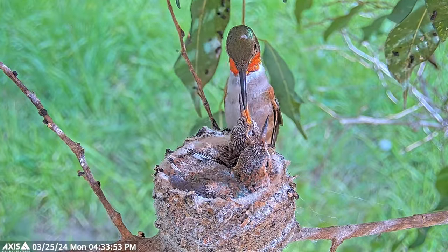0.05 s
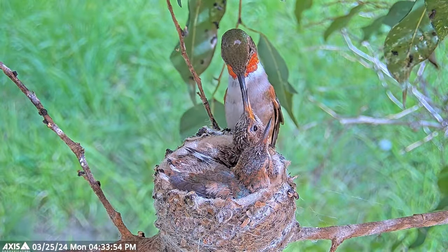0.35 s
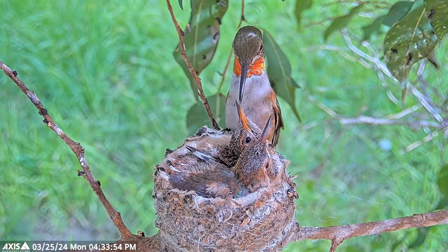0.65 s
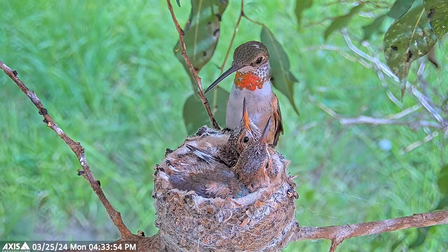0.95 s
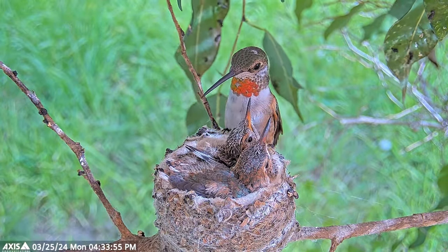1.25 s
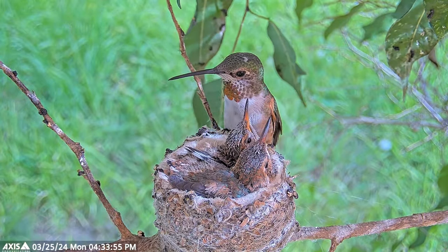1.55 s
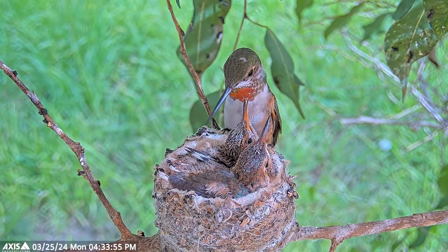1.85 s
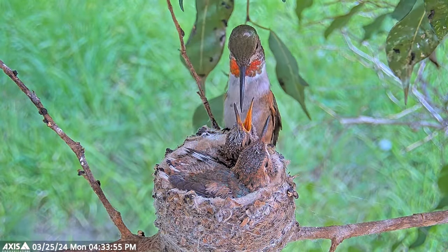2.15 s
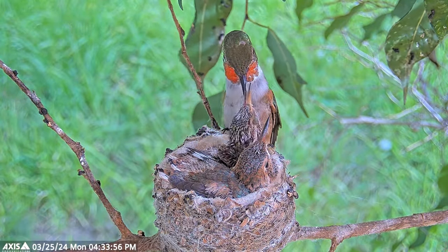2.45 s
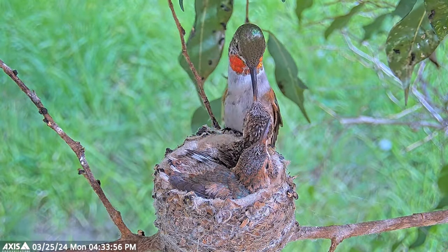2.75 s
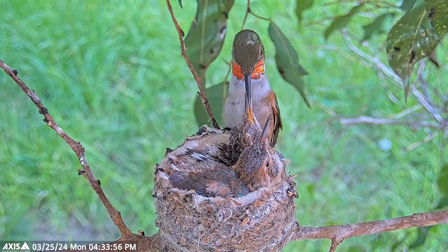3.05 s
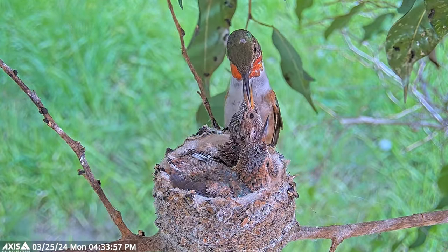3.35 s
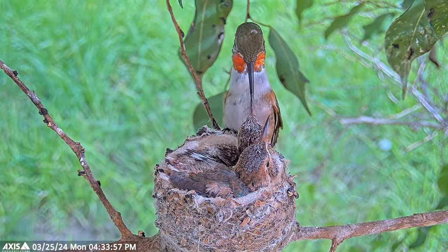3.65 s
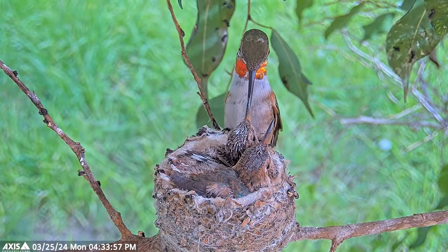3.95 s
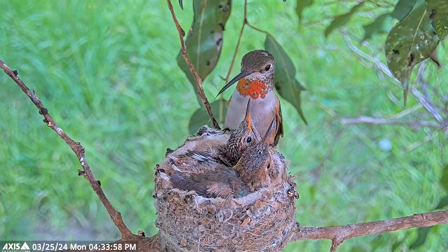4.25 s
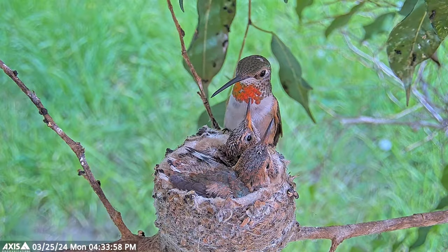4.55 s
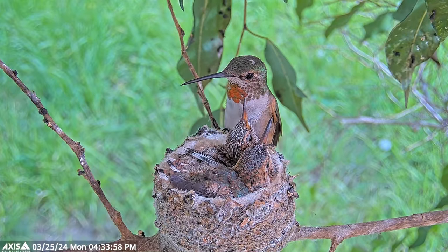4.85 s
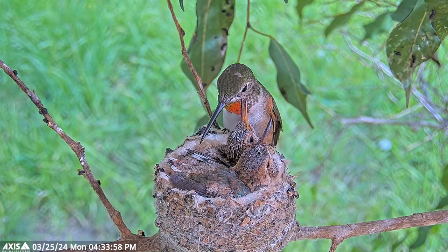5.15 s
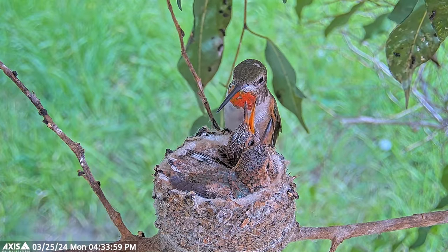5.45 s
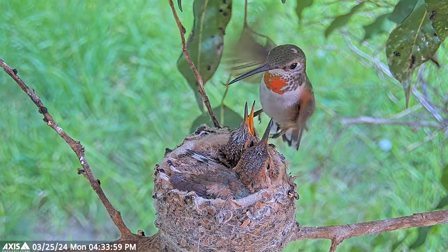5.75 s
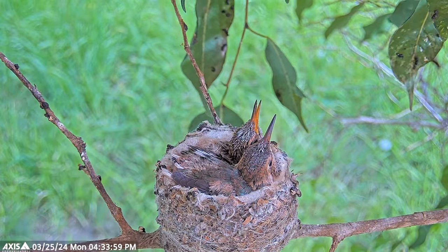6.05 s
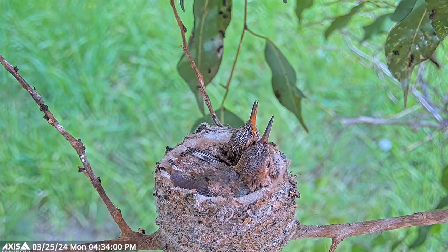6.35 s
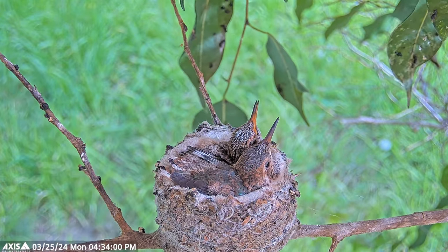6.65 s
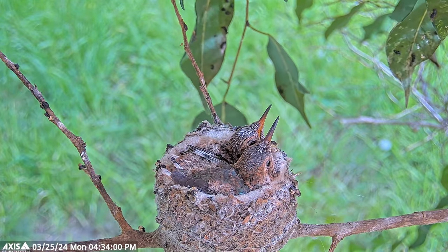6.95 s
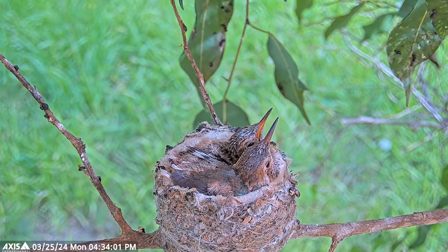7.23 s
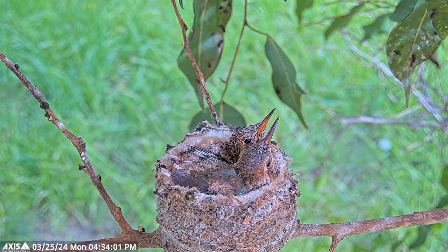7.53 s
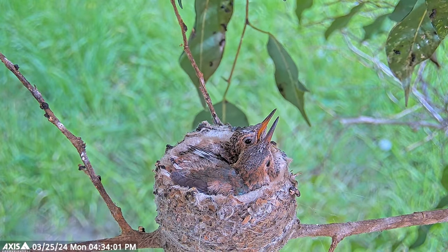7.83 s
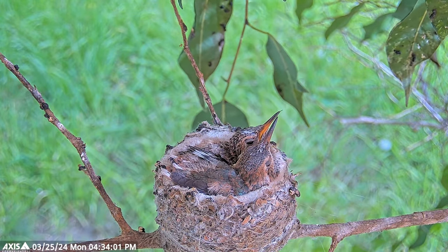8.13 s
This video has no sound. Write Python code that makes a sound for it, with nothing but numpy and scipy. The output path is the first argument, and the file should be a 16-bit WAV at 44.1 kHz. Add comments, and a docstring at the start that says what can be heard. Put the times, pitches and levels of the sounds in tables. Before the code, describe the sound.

A quiet garden ambience runs throughout: low rumble and tyre noise from distant traffic, with a steady hiss. At about 0.5 seconds a distant bird gives one short, hoarse rising whistle. Faint peeps and dry chips follow between 2.2 and 3.5 seconds, lightly echoing. Far engines drone softly from about 2.5 seconds, and distant cars swell gently around 4.5 and 7 seconds.

At about 5.9 seconds a hummingbird takes off close to the microphone, with a few tiny, sharp clicks of claws and feathers on the nest. Its wings make a low, buzzing hum with a rapidly pulsing, airy swish. The hum wavers and dips slightly in pitch, is loudest around 6.5 to 6.6 seconds with a brief feather rasp, and fades by 7 seconds. The rumble, engine drone and hiss continue until the end, just past 8 seconds.

```python
"""In a garden, a hummingbird leaves its nest beside a small camera microphone, hovers and darts past.
Periodic forces of the wings on the air make a harmonic hum; turbulent flow through the feathers
makes a swish pulsed by the strokes. Other birds call faintly, scattered by leaves and walls.
Beneath it all lie the rumble, tyre roar and engine drone of distant traffic, and a steady hiss."""
import sys
import numpy as np
from scipy import signal
from scipy.fft import rfft, irfft, next_fast_len
from scipy.io import wavfile
from scipy.ndimage import uniform_filter1d

SR = 44100
rng = np.random.default_rng(int(sys.argv[2]) if len(sys.argv) > 2 else 0)


def dump(signal):
    """Clip the signal to [-1, 1] and save it as 16-bit WAV at the path in sys.argv[1]."""
    limited = np.clip(np.atleast_2d(signal).T, -1, 1)
    pcm = np.round(limited * 32767).astype(np.int16)
    wavfile.write(sys.argv[1], SR, pcm)


N = 365588
TIME = np.arange(N) / SR

# spectra of ground rumble, tyre roar and hiss: f/Hz, relative spectral density/dB
RUMBLE_SPECTRUM = [(12, -15), (25, 7.5), (45, 0.5), (70, -2.5), (100, -6.5), (150, -14.5), (250, -21),
                   (500, -39), (4000, -90)]
TYRE_SPECTRUM = [(100, -15), (200, -5), (330, -1), (600, -3), (850, -4), (1200, -12.5), (1800, -10),
                 (2500, -23), (5000, -35), (16000, -70)]
HISS_SPECTRUM = [(200, -1.5), (1200, 0), (2500, 0), (5000, -1), (7500, -3.5), (9500, -7.5), (11500, -14.5),
                 (13500, -17.5), (16000, -20.5)]
# distant cars: closest t/s, time to half power/s, peak level/dB
CAR_PASSES = [(3.3, 0.75, -53.5), (4.5, 0.55, -45), (5.8, .4, -47), (7.25, 0.62, -45)]
# slow drift of the hiss: t/s, level/dB
HISS_ENVELOPE = [(0, -49), (1.4, -46.5), (4, -48.5), (5.8, -48), (7, -47), (7.5, -48), (8.29, -46)]
# far engines: loudest t/s, half length/s, f/Hz, glide/(Hz/s), level/dB, level of the octave/dB
ENGINES = [(0.997, 1.05, 114.8, 1, -64, -56), (2.601, 0.79, 115.3, 0.5, -54, -53.5),
           (2.798, 0.93, 95, 1.5, -47, -56.5), (3.795, 0.66, 90.5, -1, -41.5, -60),
           (5.3, 0.78, 91.3, 0, -46.5, -51), (7.099, 1.63, 118.1, 0.75, -40, -50),
           (7.499, 0.93, 89.1, -3, -42.5, -56), (7.3, 0.84, 213.6, -3.5, -52, -55)]
# faint bird notes: t/s, length/s, start f/Hz, end f/Hz, level/dB
PEEP_NOTES = [(2.17, 0.027, 3210, 3030, -56), (2.393, 0.074, 3620, 3430, -63),
              (3.188, 0.044, 3577, 3360, -53), (3.213, 0.034, 7900, 6650, -53),
              (3.285, 0.033, 8770, 8100, -54), (3.353, 0.021, 2070, 2190, -50),
              (3.375, .04, 8430, 7200, -54), (3.483, 0.038, 4810, 5000, -52)]
# distant dry chips: t/s, initial level/dB, centre f/Hz
CHIP_NOTES = [(2.378, -40, 2600), (2.392, -51, 3600), (2.445, -45.5, 1900)]
# wingbeat rate, fastest at lift-off and slowest in the hover: t/s, f/Hz
WINGBEAT = [(5.84, 58.9), (5.98, 65.6), (6.07, 57.5), (6.17, 59.8), (6.24, 55.25), (6.38, 49.74),
            (6.51, 53.67), (6.95, 55.1)]
# gain of the wing sound as the bird nears and leaves the microphone: t/s, gain/dB
FLIGHT_GAIN = [(5.87, -47.5), (5.975, -37), (6.035, -37.5), (6.092, -27), (6.14, -31.5), (6.19, -32.5),
               (6.238, -37), (6.29, -29), (6.42, -31), (6.495, -22), (6.612, -23), (6.78, -43.5),
               (6.95, -47)]
# the bird banks away: t/s, half length/s
BANKING = [(6.182, 0.036), (6.688, 0.12)]
# spectral envelopes of the wing reversal and the wingtip buzz: f/Hz, relative level/dB
FLICK_SPECTRUM = [(150, 3), (215, 2.5), (260, -1.5)]
BUZZ_SPECTRUM = [(250, 4.5), (290, 3), (350, -1), (385, -6.5), (430, 1.5), (480, 2.5), (540, -7.5),
                 (600, -4.5), (660, -9), (760, -24)]
# air through the feathers: f/Hz, relative spectral density/dB
SWISH_SPECTRUM = [(300, 10.5), (800, 4.5), (1300, -4), (2500, -1), (4800, -3.5), (7500, -0.5),
                  (10000, -10.5), (13000, -19), (16000, -29)]
# claws and feathers catch on the nest: t/s, initial level before the low-pass/dB, centre f/Hz
NEST_SNAGS = [(5.878, -39, 8060), (5.904, -39, 7000), (5.9815, -29, 7450), (6.0212, -27.5, 5500),
              (6.206, -37, 7000)]
# feathers rub in a swerve: t/s, half length/s, level/dB, centre f/Hz
FEATHER_RASPS = [(6.10, 0.014, -50, 3500), (6.502, 0.029, -39, 4700)]


def undb(db):
    """Amplitude ratio for a level in decibels."""
    return 10 ** (np.asarray(db) / 20)


def unit(x):
    """Normalisation to rms 1."""
    return x / np.sqrt(np.mean(x ** 2))


def curves(table):
    """Linear interpolation of a table's columns in time."""
    s, *columns = np.transpose(table)
    return [np.interp(TIME, s, c) for c in columns]


def swell(s, half_length):
    """Gaussian envelope: 1 at time s, 1/e a half length away."""
    return np.exp(-((TIME - s) / half_length) ** 2)


def walk(rate_hz):
    """Random modulation: smoothed noise with a spread near 1."""
    hold = int(SR / rate_hz)
    steps = np.repeat(rng.standard_normal(N // hold + 1), hold)[:N]
    return 1.3 * uniform_filter1d(uniform_filter1d(steps, hold), hold)


def noise(spectrum):
    """Spectral shaping of white noise, at rms 1."""
    hz, db = np.transpose(spectrum)
    size = next_fast_len(N)
    f = np.maximum(np.fft.rfftfreq(size, 1 / SR), 1)
    gain = undb(np.interp(np.log(f), np.log(hz), db)) * np.minimum(f / hz[0], 1)
    return unit(irfft(rfft(rng.standard_normal(size)) * gain, size)[:N])


def band_noise(hz, spread, n):
    """Band-pass noise whose edges lie a factor 1 + spread either side of hz."""
    band = signal.butter(2, [hz / (1 + spread), hz * (1 + spread)], "band", fs=SR, output="sos")
    return signal.sosfilt(band, rng.standard_normal(n))


def traffic(roads_db=-54, rumble_base_db=-39.5, rumble_follows=0.4, gust_db=1):
    """Inverse-square law: passing cars add in power to the roads' roar, and the rumble grows with it."""
    passing = sum(undb(db) ** 2 / (1 + ((TIME - s) / half_time) ** 2) for s, half_time, db in CAR_PASSES)
    roar = np.sqrt(undb(roads_db) ** 2 + passing)
    rumble = undb(rumble_base_db + 6.4 * swell(6.26, 0.56))  # swells around take-off
    rumble *= (roar / undb(roads_db)) ** rumble_follows
    return noise(RUMBLE_SPECTRUM) * rumble * undb(gust_db * walk(9.6)) + noise(TYRE_SPECTRUM) * roar


def hiss():
    """Broadband noise with a slowly drifting level."""
    level_db, = curves(HISS_ENVELOPE)
    return noise(HISS_SPECTRUM) * undb(level_db)


def engine(s, half_length, hz, glide, db, octave_db, waver=0.00413, flutter_db=2):
    """Periodic firing gives a far engine a fundamental and its octave, which swell and fade."""
    pitch = (hz + glide * (TIME - s)) * (1 + waver * walk(6))
    phase = 2 * np.pi * np.cumsum(pitch) / SR
    fundamental = undb(db + flutter_db * walk(7.5)) * np.sin(phase)
    octave = undb(octave_db + flutter_db * walk(6.7)) * np.sin(2 * phase)
    return np.sqrt(2) * swell(s, half_length) * (fundamental + octave)


def rising_call(start_s=.52, length_s=.122, start_hz=2470, top_hz=3795, gain_db=-39.5,
                attack_s=0.032, release_s=0.0079, fall_db_per_s=31):
    """Random frequency and amplitude modulation make a bird's upward whistle hoarse."""
    t = TIME - start_s
    to_go = np.clip(1 - t / length_s, 0, 1)
    hz = top_hz - (top_hz - start_hz) * to_go ** 2
    phase = 2 * np.pi * np.cumsum(hz * (1 + .024 * walk(600))) / SR
    tone = np.sin(phase) + undb(-12) * np.sin(1.31 * phase)  # weaker partial about a fourth above
    envelope = np.clip(np.minimum(t / attack_s, (length_s - t) / release_s), 0, 1)
    throb = 1 - 0.43 * np.sin(np.pi * (TIME - 0.566) / 0.047) ** 2  # peaks in mid climb and at the top
    gain = undb(gain_db - fall_db_per_s * np.clip(t, 0, length_s))
    hoarseness = 1 + undb(-7) * walk(500)
    return np.sqrt(2) * gain * envelope * throb * hoarseness * tone


def garden_scatter(x, t60=0.49, wet_db=-3, build_s=0.0053):
    """Reverberation: leaves and walls scatter sound into a diffuse, exponentially decaying tail."""
    t = TIME[:SR]
    tail = rng.standard_normal(SR) * np.exp(-np.log(1000) * t / t60) * (1 - np.exp(-t / build_s))
    return x + undb(wet_db) * signal.fftconvolve(x, tail / np.linalg.norm(tail))[:N]


def peeps():
    """Random frequency modulation gives short gliding notes a husky quaver."""
    out = np.zeros(N)
    quaver = 1 + .035 * walk(900)
    for s, length, start_hz, end_hz, db in PEEP_NOTES:
        i, n = int(s * SR), int(length * SR)
        phase = 2 * np.pi * np.cumsum(np.linspace(start_hz, end_hz, n) * quaver[i:i + n]) / SR
        out[i:i + n] += np.sqrt(2) * undb(db) * np.sin(phase) * signal.windows.tukey(n, .5)
    return out


def bursts(table, decay_s, spread):
    """Transients of band-limited noise with exponential decay."""
    out = np.zeros(N)
    t = TIME[:SR // 2]
    for s, db, hz in table:
        i = int(s * SR)
        out[i:i + len(t)] += undb(db) * unit(band_noise(hz, spread, len(t))) * np.exp(-t / decay_s)
    return out


def chips():
    """Rapidly damped noise is heard as the dry chips of distant birds."""
    return bursts(CHIP_NOTES, decay_s=0.013, spread=0.47)


def wings(mid_downstroke_s=6.567, fade_s=0.027, steady_air=0.26, upstroke=0.46):
    """One periodic motion, the wingbeat, sets the phase of the hum, overtones and feather noise."""
    hz, = curves(WINGBEAT)
    gain_db, = curves(FLIGHT_GAIN)
    bank = sum(swell(s, half_length) for s, half_length in BANKING)
    turns = np.cumsum(hz) / SR
    turns -= turns[int(mid_downstroke_s * SR)]  # whole turns fall in mid downstroke
    # air rushes through the feathers in the middle of each half stroke
    airflow = steady_air + stroke_pulse(turns, 0, 0.071) + upstroke * stroke_pulse(turns, 0.48, 0.069)
    inside_s = np.minimum(TIME - FLIGHT_GAIN[0][0], FLIGHT_GAIN[-1][0] - TIME)
    flying = np.clip(inside_s / fade_s + 1, 0, 1)
    sound = wing_hum(turns, bank) + wing_overtones(hz, turns, bank) + feather_swish(hz, turns, airflow)
    return flying * undb(gain_db) * sound + feather_rasps(airflow)


def stroke_pulse(turns, centre, width):
    """Periodic envelope: one smooth pulse per beat, with centre and width in turns."""
    return np.exp((np.cos(2 * np.pi * (turns - centre)) - 1) / (2 * np.pi * width) ** 2)


def wing_hum(turns, bank, lift_db=2, drag_db=6.5):
    """Oscillating forces radiate tones: lift peaks once a beat, drag on both half strokes."""
    # directivity: banking turns the lift tone towards the microphone, a steep bank the drag tone away
    lift = undb(lift_db + 11 * bank) * np.cos(2 * np.pi * turns)
    drag = undb(drag_db - 13 * bank ** 4) * np.cos(4 * np.pi * turns)
    return np.sqrt(2) * (lift + drag)


def wing_overtones(hz, turns, bank, reversal_turns=0.244, flick_db=-1, buzz_db=-10, flutter_db=1.9):
    """Brief pulses are rich in harmonics: the wing flicks over at the reversal and its tips buzz."""
    since_reversal = turns - reversal_turns
    flick = harmonics(FLICK_SPECTRUM, hz, since_reversal, wander_rad=.22, orders=range(3, 5))
    buzz_gain = undb(buzz_db + 2.5 * bank + flutter_db * walk(46))  # banking aims it at the microphone
    buzz = harmonics(BUZZ_SPECTRUM, hz, since_reversal, wander_rad=.35, orders=range(5, 15))
    return undb(flick_db) * flick + buzz_gain * buzz


def harmonics(spectrum, hz, turns, wander_rad, orders):
    """Fourier synthesis of one pressure dip per beat, at rms 1; drifting phases vary its shape."""
    f, db = np.transpose(spectrum)
    out = power = 0
    for k in orders:
        gain = undb(np.interp(k * hz, f, db))
        out = out - gain * np.cos(2 * np.pi * k * turns + wander_rad * walk(16))
        power = power + gain ** 2 / 2
    return out / np.sqrt(power)


def feather_swish(hz, turns, airflow, cruise_hz=52, cruise_db=-15, db_per_hz=0.72, tick_db=-14):
    """Turbulent flow through the feathers makes pulsed noise, stronger as the wings beat faster."""
    rush = unit(noise(SWISH_SPECTRUM) * airflow * undb(1.3 * walk(110)))
    # the feather tips tick softly as they fan out before the downstroke
    fanning = np.exp(-((turns - .72) % 1) / .09) * undb(2 * walk(55))
    ticks = unit(noise([(3000, -20), (8500, 0), (11500, -4), (15000, -17)]) * fanning)
    return undb(cruise_db + db_per_hz * (hz - cruise_hz)) * (rush + undb(tick_db) * ticks)


def nest_snags(edge_hz=9600):
    """Impulsive contact of claws and feathers with the nest makes clicks, dulled by the microphone."""
    clicks = bursts(NEST_SNAGS, decay_s=.002, spread=.9)
    return signal.sosfilt(signal.butter(2, edge_hz, fs=SR, output="sos"), clicks)


def feather_rasps(airflow, spread=0.28):
    """Friction between feathers makes narrow-band noise on each half stroke of a swerve."""
    return sum(undb(db) * swell(s, half_length) * unit(airflow * band_noise(hz, spread, N))
               for s, half_length, db, hz in FEATHER_RASPS)


def scene():
    """Superposition of the hummingbird, the garden birds and the background, in one channel."""
    hummingbird = nest_snags() + wings()
    birds = garden_scatter(rising_call() + peeps() + chips())
    background = traffic() + hiss() + sum(engine(*row) for row in ENGINES)
    return (hummingbird + birds + background)[None]


def record(dry):
    """Band limiting: the camera cuts steeply above 15850 Hz."""
    return signal.sosfilt(signal.ellip(12, .1, 80, 15850, fs=SR, output="sos"), dry)


dry = scene()
out = record(dry)
dump(out)
```